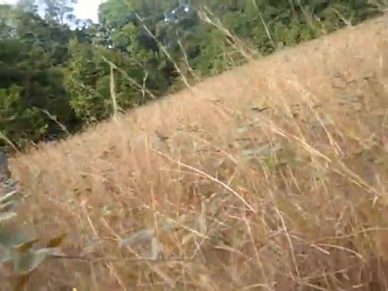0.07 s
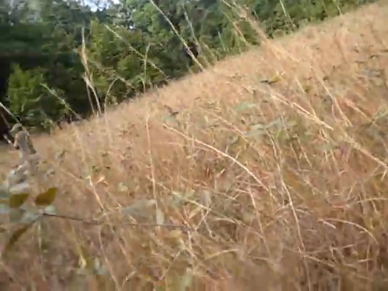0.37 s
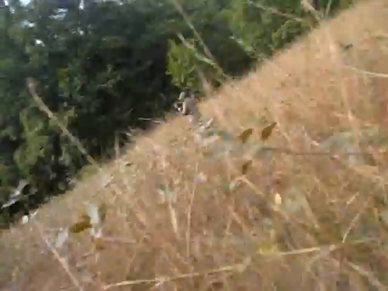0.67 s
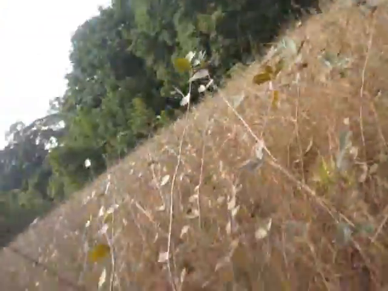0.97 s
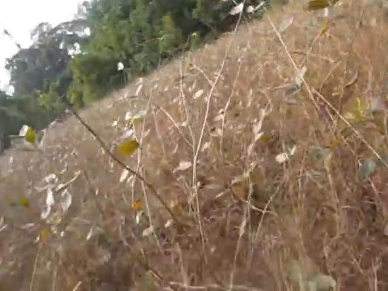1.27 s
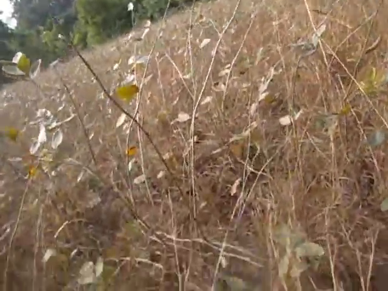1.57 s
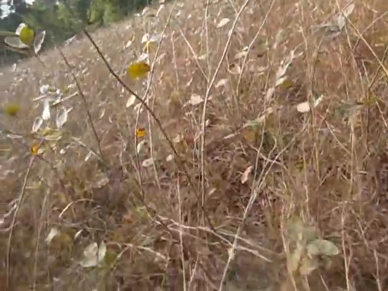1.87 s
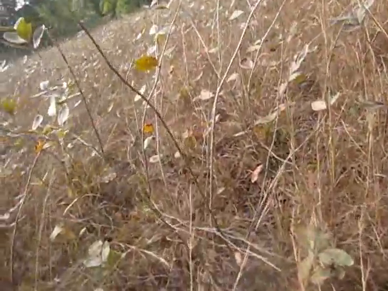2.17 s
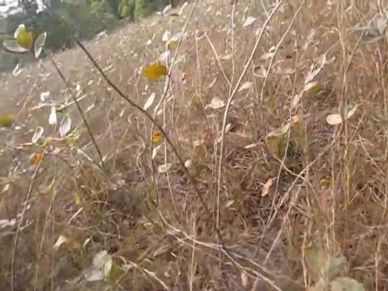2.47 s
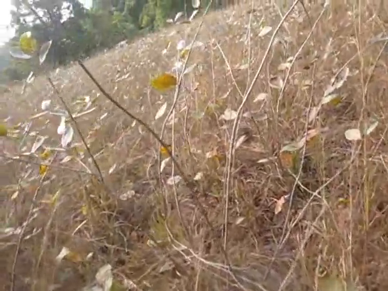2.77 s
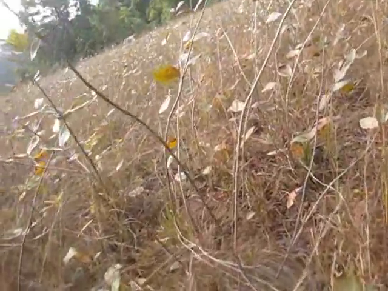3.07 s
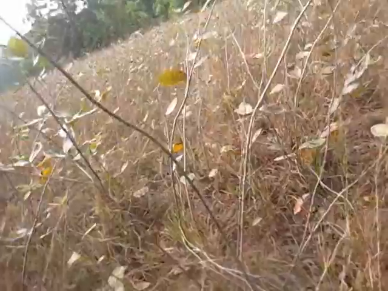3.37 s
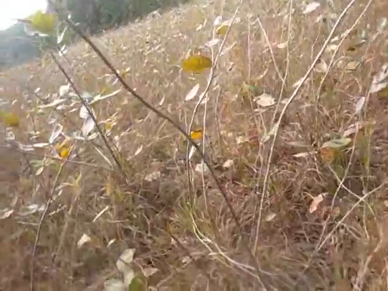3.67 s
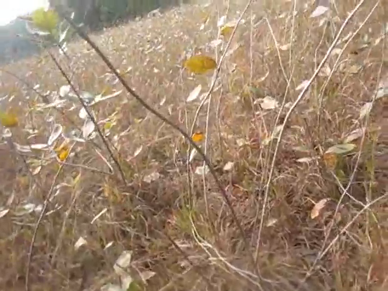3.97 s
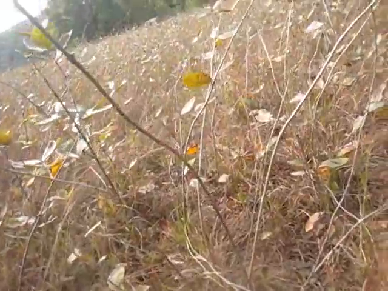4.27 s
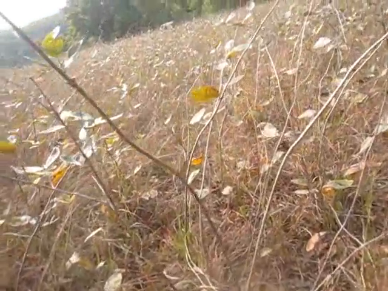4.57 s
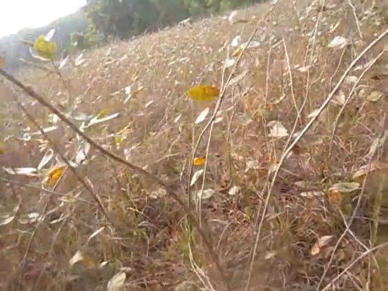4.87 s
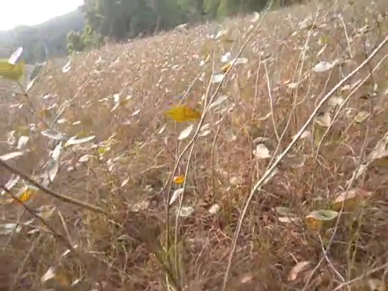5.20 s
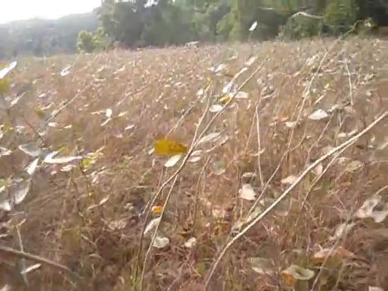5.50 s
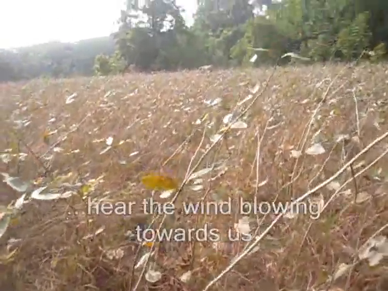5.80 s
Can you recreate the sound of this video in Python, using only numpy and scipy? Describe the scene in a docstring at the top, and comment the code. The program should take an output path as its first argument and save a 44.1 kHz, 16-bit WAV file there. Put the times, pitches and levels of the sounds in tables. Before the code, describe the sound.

Dry grass rustles and crackles underfoot, with bursts of wind buffeting the microphone in between.

```python
"""First comes the hiss of an open field and a faint rustle of tall dry grass.
Then gusts of wind break into eddies (small whirls of air) that thump on one small hand-held microphone.
Twice the stalks are pushed aside: they swish as they rub, stems snap and dead leaves crunch underfoot.
Among the thumps, a far bird hoots twice."""
import sys
import numpy as np
from scipy import signal
from scipy.fft import rfft, irfft
from scipy.io import wavfile
from scipy.ndimage import uniform_filter1d

SR = 44100
rng = np.random.default_rng(int(sys.argv[2]) if len(sys.argv) > 2 else 0)


def bounce(signal):
    """Save signal as a 16-bit WAV file at the path given by the first command-line argument."""
    frames = np.transpose(np.atleast_2d(signal))
    limited = np.clip(frames, -1, 1)
    pcm = np.round(limited * 32767).astype(np.int16)
    wavfile.write(sys.argv[1], SR, pcm)


N = 261954
TIME = np.arange(N) / SR
TOP_HZ = 15950  # the highest pitch the microphone lets through

# the hardest eddies hitting the microphone: (time [s], relative level [dB], base length [s], base pitch [Hz])
EDDIES = [(0.095, -39.5, 0.042, 95), (0.359, -35.5, 0.024, 95), (0.862, -25, .018, 334),
          (0.982, -32.5, .022, 127), (1.086, -31.5, 0.03, 180), (1.1604, -20.5, 0.016, 173),
          (1.232, -11.5, 0.012, 296), (1.3206, -11, .015, 280), (1.347, -15.5, 0.0409, 280),
          (1.381, -17, 0.015, 443), (1.397, -14.5, 0.0063, 277), (1.529, -17, 0.021, 246),
          (1.6328, -18, 0.04, 211), (1.689, -17, 0.042, 266), (1.7418, -9.5, 0.0091, 500),
          (1.7525, -10, 0.013, 387), (1.7673, -13.5, 0.018, 520), (1.789, -14.5, 0.0079, 384),
          (1.811, -15, 0.039, 276), (1.9945, -18, 0.0075, 248), (2.008, -20, 0.035, 180),
          (2.119, -16.5, 0.03, 167), (2.144, -10, 0.025, 166), (2.25, -21.5, 0.052, 160),
          (2.38, -11.5, 0.0083, 167), (2.402, -13.5, 0.016, 183), (2.478, -13, .02, 267),
          (2.851, -16, 0.033, 164), (2.879, -12, 0.0163, 275), (3.008, -29.5, .017, 266),
          (3.1517, -19.5, 0.022, 214), (3.196, -11, 0.015, 385), (3.21, -15, 0.0118, 290),
          (3.241, -16, 0.027, 226), (3.271, -9, 0.023, 312), (3.3, -15, 0.057, 295),
          (3.34, -13, 0.028, 340), (3.4508, -3, 0.005, 473), (3.4698, -8, 0.028, 307),
          (3.5085, -11, 0.022, 270), (3.5582, -23, 0.045, 234), (3.78, -31.5, 0.0334, 142),
          (3.946, -31.5, 0.03, 162), (4.0124, -23, 0.028, 226), (4.094, -24.5, 0.026, 190),
          (4.129, -15.5, 0.037, 278), (4.1742, -13, 0.013, 347), (4.238, -13, 0.026, 356),
          (4.255, -14.5, .024, 115), (4.2673, -13, .02, 285), (4.299, -15, 0.02, 213),
          (4.341, -13, 0.033, 260), (4.367, -14, .016, 290), (4.74, -21.5, 0.044, 196),
          (4.836, -29, 0.016, 245), (5.221, -33.5, 0.014, 258), (5.446, -30, 0.027, 222),
          (5.468, -24, 0.022, 131)]
# wind strength at the microphone, gusts and lulls: (time [s], level [dB])
WIND_STRENGTH = [(0.0, -42), (0.22, -60.5), (0.57, -66), (0.74, -35), (1.1, -40.5), (1.4, -24), (2.05, -39),
                 (2.31, -51), (2.52, -30.5), (2.66, -55.5), (2.88, -28), (3.58, -32), (3.7, -44.5),
                 (4.05, -39), (4.4, -33), (4.54, -66), (4.7, -28), (4.92, -49.5), (5.14, -64), (5.28, -42),
                 (5.6, -55)]
# stalks and leaves brushing together: (time [s], level [dB], fizz compared with that level [dB])
GRASS_MOTION = [(0.0, -46, -2), (0.18, -50.5, -2), (0.42, -47, -5), (0.55, -46, 3.5), (0.65, -34.5, 2),
                (0.9, -43, 10.5), (1.14, -38, -0.5), (1.28, -43.5, -4.5), (2.0, -52, -4.5),
                (3.25, -46.5, -4.5), (3.42, -42.5, -5), (3.56, -47, -2), (3.82, -43.5, -5.5),
                (3.87, -40.5, 1.5), (4.18, -40, 1), (4.44, -35, 3), (4.58, -36.5, -2.5),
                (4.81, -34.5, -3.5), (4.92, -44, -8), (5.25, -45, -0.5), (5.44, -53.5, -3.5),
                (5.94, -44, -3.5)]
# hollow stalks sliding on each other: (middle time [s], length [s], level [dB], pitch [Hz], band width [Hz])
STALK_SLIDES = [(0.67, .12, -38, 8200, 2200), (0.877, 0.15, -33, 2350, 800), (0.99, 0.16, -37, 2400, 900),
                (2.918, 0.066, -47, 9500, 5000), (3.69, .07, -41, 6900, 6000),
                (4.33, 0.45, -41.5, 5040, 1800), (4.472, 0.13, -35.5, 2550, 450),
                (4.566, 0.088, -33.5, 4330, 1000), (4.783, 0.19, -37, 5660, 2200),
                (4.976, .025, -38.5, 5500, 3000), (5.04, 0.026, -37, 12500, 4000)]
# dry stems cracking: (time [s], level of the first 5 ms [dB], fade time [s], ring pitch [Hz], ring gain [dB])
STEM_BREAKS = [(0.277, -41.5, 0.052, 3350, 5), (0.4533, -22, 0.00032, 2880, -12),
               (0.598, -34, 0.0036, 6130, 9), (0.638, -34, .0035, 4670, 13),
               (0.779, -22, 0.0014, 10500, 22), (0.784, -26, 0.0096, 2420, 16),
               (0.845, -26, 0.0052, 12500, 4), (0.902, -35, .0033, 2360, 17), (1.112, -18, 0.0019, 6200, 8),
               (1.112, -22.5, 0.002, 3400, 17), (1.535, -43.5, 0.0077, 6160, 25),
               (2.139, -47, 0.025, 2580, 2), (2.836, -40.5, .0018, 7600, 16),
               (3.085, -42.5, .0095, 11600, 9), (3.5097, -33.5, .0046, 2540, 16),
               (3.7425, -36.5, .0085, 5150, -10), (3.8451, -29, 0.0037, 5900, -21),
               (3.884, -31.5, .016, 3100, 8), (4.402, -26.5, .012, 4270, 4), (4.422, -27, .0048, 4500, 19),
               (4.4545, -25, 0.0028, 2510, 19), (4.596, -29, 0.0031, 4050, 4),
               (4.8127, -27.5, 0.0011, 6050, 24), (4.873, -28.5, .0025, 4570, 9),
               (5.016, -33, 0.0049, 12000, -11), (5.069, -33, 0.011, 3730, -11),
               (5.218, -36, .007, 3500, 4), (5.608, -42, .014, 3640, 21)]
# dead leaves crushed on the ground: (peak time [s], relative level [dB], fade time [s])
LEAF_CRUSHES = [(0.01, -41, 0.021), (0.345, -37, 0.013), (0.47, -28.5, 0.028), (0.514, -38, 0.035),
                (0.787, -27.5, 0.012), (0.86, -33.5, .19), (3.68, -42, .04), (3.93, -44.5, 0.13),
                (4.556, -35, 0.023), (4.811, -32, 0.023), (4.91, -37, 0.15), (4.974, -37.5, 0.0069),
                (5.067, -35.5, .012), (5.17, -51, 0.096)]
# the far bird's calls: (start time [s], length [s], pitch [Hz], level [dB])
BIRD_CALLS = [(1.489, 0.1, 934, -49), (2.327, 0.087, 930, -50.5)]
# tone of the papery stalks: (frequency [Hz], relative level [dB])
STALK_TONE = [(600, -9), (1500, -3), (2000, 0), (2450, 1.5), (3000, -0.5), (3500, -3.5), (4400, -2.5),
              (5500, -5), (6400, -5.5), (8500, -11), (16000, -56)]
# tone of the thin, fizzing blades: (frequency [Hz], relative level [dB])
BLADE_TONE = [(3000, -3.5), (5500, -8.5), (7000, -4.5), (9000, -3.5), (10800, -3.5), (13000, -3.5),
              (16000, -7.5)]
# tone of the dead leaves: (frequency [Hz], relative level [dB])
LEAF_TONE = [(150, -12.5), (400, -4.5), (900, 1), (1500, -5.5), (2500, -5), (5000, -14.5)]
# tone of the open field's hiss: (frequency [Hz], relative level [dB])
FIELD_TONE = [(180, -45), (300, 0.5), (440, 0), (478, 1.5), (787, 0), (870, 1.5), (1530, -5.5),
              (2610, -10.5), (2790, -13), (3700, -14.5), (16000, -22.5)]


def wind_thumps(lumpy_db=4.5, pop_s=0.014):
    """Each eddy is a pressure pop inside a lumpy swirl; short ones are mostly pop, fast ones brighter."""
    out = np.zeros(N)
    t = TIME[:SR // 5] - 0.1  # zero at the middle of the eddy
    for when, db, length, hz in EDDIES:
        cutoff_hz = 1.187 * hz * (hz / 280) ** 0.23
        count = int(1.197 * length * SR)
        lumps = shaped(rng.standard_normal(count), lambda f: 1 / (1 + (f / 200) ** 4))
        puff = even_noise(count) * amp(lumpy_db * lumps) * signal.windows.tukey(count, 0.8)
        swirl, pop = np.zeros((2, len(t)))
        add(swirl, -t[0] - count / SR / 2, puff)
        add(pop, -t[0], rng.choice([-1., 1.], 1))  # one push or pull
        pop_share = 1 / (1 + (length / pop_s) ** 2)
        thump = np.sqrt(1 - pop_share) * on_microphone(swirl, cutoff_hz)
        thump += np.sqrt(pop_share) * on_microphone(pop, 1.09 * cutoff_hz)
        add(out, when + t[0], amp(db) * unit(thump) * np.sqrt(length * SR / len(t)))
    return amp(-1.63) * out


def wind_rumble():
    """Slow pressure swells and a flutter of small eddies follow the wind and crowd around each thump."""
    def near_thumps(reach_s):
        return np.sqrt(sum(amp(db) ** 2 * length / reach_s * np.exp(-((TIME - when) / reach_s) ** 2)
                           for when, db, length, _ in EDDIES))
    wind = amp(follow(WIND_STRENGTH))
    swell_tone = [(20, -13), (40, -6.5), (65, -4.5), (90, -3), (160, -18), (500, -91)]
    swell = coloured(rng.standard_normal(N), swell_tone)
    small_eddies = unit(rng.standard_normal(N) * amp(4.1 * wander(43)))
    flutter = on_microphone(small_eddies, cutoff_hz=169)
    swell_level = np.hypot(amp(-13) * wind ** 0.62, amp(-24) * near_thumps(reach_s=0.038))
    flutter_level = np.hypot(wind, amp(-12.5) * near_thumps(reach_s=0.029))
    return swell_level * swell + flutter_level * flutter


def on_microphone(swirl, cutoff_hz, bass_hz=155, ring_q=1.13):
    """An eddy's size limits its treble; the microphone drops the deepest bass and rings briefly there."""
    def gain(f):
        treble_cut = np.exp(-(f / cutoff_hz) ** 1.37) / np.sqrt(1 + (f / 1250) ** 8)
        s = 1j * f / bass_hz
        bass_cut = s ** 2 / (s ** 2 + s / ring_q + 1)
        return treble_cut * bass_cut
    return shaped(swirl, gain)


def membrane_slap(wind, slap_db=0.5, above_hz=1500):
    """The hardest thumps push the microphone's membrane too far, which adds a bright slap to the wind."""
    treble = signal.butter(3, above_hz, "high", fs=SR, output="sos")
    return wind + amp(slap_db) * signal.sosfilt(treble, np.tanh(wind) ** 5)


def grass_swish(spurt_db=0.26, shake_db=-12.5):
    """One rubbing motion, in small spurts, drives the papery stalks and the fizz of thin blades."""
    motion = amp(follow(GRASS_MOTION) + spurt_db * wander(4.7))
    level = np.hypot(motion, amp(shake_db) * crush_level())  # a crunch also shakes the stalks
    rub = friction(per_s=730, spread_db=4.0, grain_share=0.19, flicker_db=1.27)
    rub = patchy(rub, depth_db=1.78)
    stalks = amp(-1.0) * coloured(rub, STALK_TONE)
    shifted_rub = signal.hilbert(rub).imag  # a quarter wave apart, so blades and stalks do not cancel
    blades = amp(follow(GRASS_MOTION, column=2) - 0.2) * coloured(shifted_rub, BLADE_TONE)
    return level * (stalks + blades)


def friction(per_s, spread_db, grain_share, flicker_db):
    """Countless tiny slips blur into hiss; larger ones stand out as grains, and all come in clumps."""
    slips = (rng.random(N) < per_s / SR) * amp(spread_db * np.minimum(rng.exponential(1, N), 4.5))
    slip_energy = signal.lfilter([1], [1, -np.exp(-1 / (0.00012 * SR))], slips ** 2)
    grains = rng.standard_normal(N) * unit(np.sqrt(slip_energy))
    rub = np.sqrt(1 - grain_share) * rng.standard_normal(N) + np.sqrt(grain_share) * grains
    return rub * amp(flicker_db * wander(38))


def patchy(x, depth_db):
    """Each stalk rings at its own pitches for a moment, so the tone keeps shifting."""
    spectrum = signal.stft(x, nperseg=512)[2]
    patches = uniform_filter1d(rng.standard_normal(spectrum.shape), size=6, axis=0)  # blur over pitch
    patches = unit(uniform_filter1d(patches, size=7, axis=1))  # blur over time
    return signal.istft(spectrum * amp(depth_db * patches))[1][:N]


def stalk_scrapes():
    """A stalk catches and slips on another, which keeps it buzzing at its own pitch."""
    out = np.zeros(N)
    slips = friction(per_s=210, spread_db=3.5, grain_share=0.19, flicker_db=3.5)
    for middle, length, db, hz, width in STALK_SLIDES:
        stroke = np.cos(np.pi * np.clip((TIME - middle) / length, -0.5, 0.5))
        buzz = signal.lfilter(*signal.iirpeak(hz, hz / width, fs=SR), slips)
        buzz = signal.lfilter(*signal.iirpeak(hz, hz / (2 * width), fs=SR), buzz)
        out += amp(db) * stroke * unit(buzz)
    return out


def stem_snaps(shiver_db=-21, shiver_s=0.0097, ring_width_hz=380):
    """A stem breaks with a sharp crack, rings at its own pitch and shivers against its neighbours."""
    out, t = np.zeros(N), TIME[:SR // 8]
    for when, db, fade_s, ring_hz, ring_db in STEM_BREAKS:
        burst = even_noise(len(t)) * (np.exp(-t / fade_s) + amp(shiver_db) * np.exp(-t / shiver_s))
        burst[0] += 1.8  # the click of the break
        thinness = ring_hz / 5000  # thinner stems crack higher, in a narrower band
        high_hz = min(11400 * thinness, TOP_HZ)
        low_hz = min(2160 * thinness ** 1.33, high_hz / np.sqrt(2))
        band = signal.butter(3, [low_hz, high_hz], "band", fs=SR, output="sos")
        ring = signal.lfilter(*signal.iirpeak(ring_hz, ring_hz / ring_width_hz, fs=SR), burst)
        crack = signal.sosfilt(band, burst) + amp(ring_db) * ring
        add(out, when, amp(db) * crack / np.std(crack[:SR // 200]))
    return out


def leaf_crunch(drag_db=-8):
    """Dead leaves give a dull, coarse crunch when crushed underfoot or dragged by moving stalks."""
    level = np.hypot(crush_level(), amp(follow(GRASS_MOTION) + drag_db))
    crackle = friction(per_s=300, spread_db=1.5, grain_share=0.39, flicker_db=1.3)
    return amp(-1.0) * level * coloured(crackle, LEAF_TONE)


def crush_level(rise_share=0.74):
    """Each crush of dead leaves builds up and dies away; one that fades slowly also starts slowly."""
    return sum(amp(db) * np.exp(-np.maximum((peak - TIME) / rise_share, TIME - peak) / fade_s)
               for peak, db, fade_s in LEAF_CRUSHES)


def stem_taps(per_s=88, stems=24, spread_db=1.5, fade_s=0.0043, relative_db=-10):
    """Nearby stems tap one another, each with its own short ring, harder as the grass moves more."""
    out, t = np.zeros(N), TIME[:SR // 60]
    for hz in np.geomspace(2200, 12500, stems):
        hits = rng.random(N) < per_s / stems / SR
        taps = hits * amp(spread_db * np.minimum(rng.exponential(1, N), 2))
        ring = np.sin(2 * np.pi * hz * rng.uniform(1.0, 1.05) * t) + 2.3 * rng.standard_normal(len(t))
        out += signal.oaconvolve(taps, ring * np.exp(-t / fade_s))[:N]
    bright_taps = shaped(out, lambda f: 1 / (1 + (1600 / f) ** 4))
    return amp(relative_db + follow(GRASS_MOTION)) * bright_taps


def far_bird(blur_hz=22):
    """Soft, almost pure hoots, blurred by distance."""
    out = np.zeros(N)
    for start, length, hz, db in BIRD_CALLS:
        count = int(length * SR)
        cycles = np.cumsum(hz + blur_hz * wander(70)[:count]) / SR
        hoot = np.sin(2 * np.pi * cycles) * signal.windows.tukey(count, 0.7)
        add(out, start, amp(db) * unit(hoot))
    return out


def field_hiss(level_db=-51):
    """The even hiss of distant grass and trees."""
    return amp(level_db + 0.067 * wander(8.0)) * coloured(rng.standard_normal(N), FIELD_TONE)


def amp(db):
    """Turns decibels into a number to multiply by."""
    return 10 ** (np.asarray(db) / 20)


def unit(x):
    """Scales a sound to an average strength (rms) of 1."""
    return x / np.sqrt(np.mean(x ** 2) + 1e-20)


def follow(rows, column=1):
    """Joins a table's points with straight lines, giving a value for every sample."""
    rows = np.asarray(rows)
    return np.interp(TIME, rows[:, 0], rows[:, column])


def add(mix, start_s, sound):
    """Mixes a sound in at the given time."""
    part = mix[max(round(start_s * SR), 0):][:len(sound)]
    part += sound[:len(part)]


def shaped(x, gain):
    """Turns each frequency up or down by gain(frequency), then scales to strength 1."""
    hz = np.fft.rfftfreq(len(x), 1 / SR) + 1
    return unit(irfft(rfft(x) * gain(hz), len(x)))


def coloured(x, tone):
    """Filters by (frequency [Hz], level [dB]) points, falling away below the first one."""
    hz, db = np.transpose(tone)
    return shaped(x, lambda f: amp(np.interp(np.log(f), np.log(hz), db)) * np.minimum(f / hz[0], 1) ** 2)


def wander(rate_hz):
    """A smooth random drift of strength 1, mostly slower than the rate."""
    return shaped(rng.standard_normal(N), lambda f: 1 / (1 + (f / rate_hz) ** 4))


def even_noise(count):
    """Noise with the same strength at every frequency."""
    return unit(irfft(np.exp(2j * np.pi * rng.random(count // 2 + 1)), count))


def limiter(x, limit_db=-4.0, recovery_db_per_s=90):
    """Turns everything down just after the hardest thumps and recovers quickly."""
    over_db = np.maximum(20 * np.log10(abs(x) + 1e-9) - limit_db, 0)
    recovery = TIME * recovery_db_per_s
    dip_db = np.maximum.accumulate(over_db + recovery, axis=-1) - recovery
    smooth_dip_db = signal.lfilter(*signal.butter(1, 30, fs=SR), dip_db)
    return x / amp(smooth_dip_db)


def scene():
    """Grass, field and bird, with the wind on the microphone on top, in one channel."""
    plants = grass_swish() + stalk_scrapes() + stem_taps() + leaf_crunch() + stem_snaps()
    background = field_hiss() + far_bird()
    wind = membrane_slap(wind_rumble() + wind_thumps())
    return (plants + background + wind)[None]


def record(dry):
    """The hardest thumps dip the level and have their peaks rounded; the highest treble is cut off."""
    limited = limiter(dry)
    rounded = limited / (1 + limited ** 8) ** (1 / 8)
    treble_cut = signal.firwin(511, TOP_HZ, window=("kaiser", 9), fs=SR)
    return signal.oaconvolve(rounded, treble_cut[None], "same")


dry = scene()
out = record(dry)
bounce(out)
```